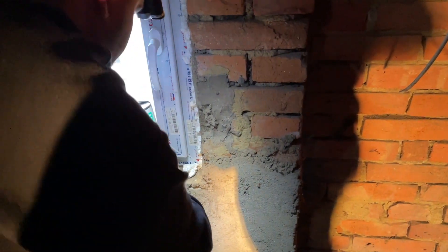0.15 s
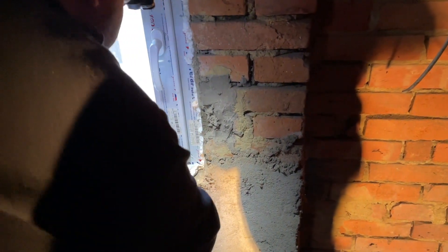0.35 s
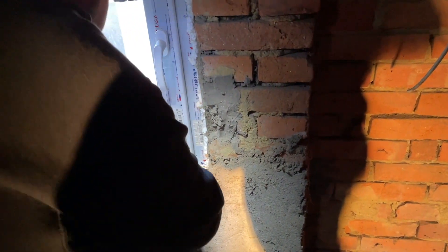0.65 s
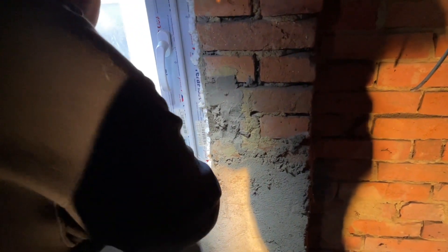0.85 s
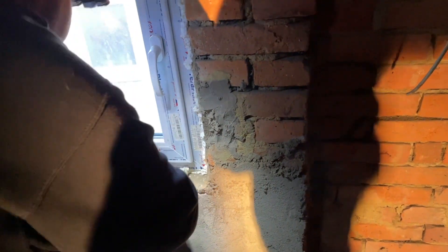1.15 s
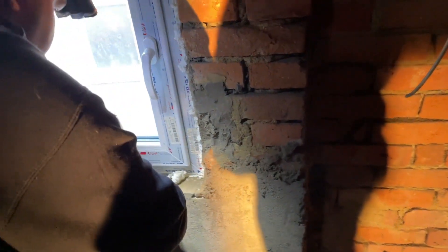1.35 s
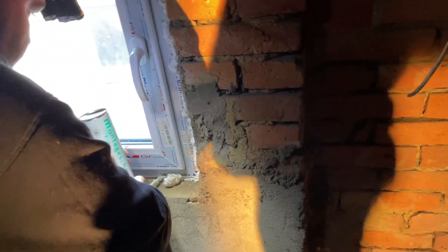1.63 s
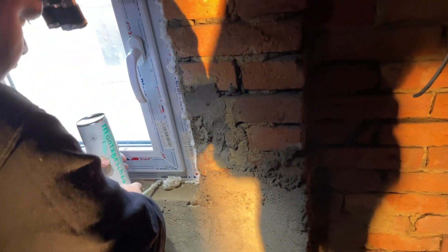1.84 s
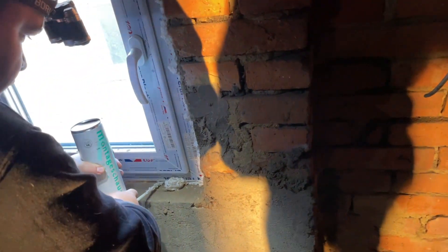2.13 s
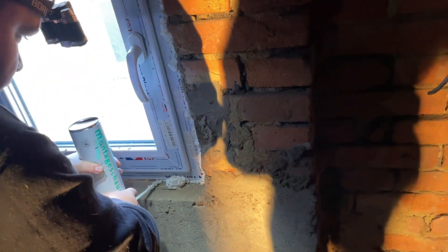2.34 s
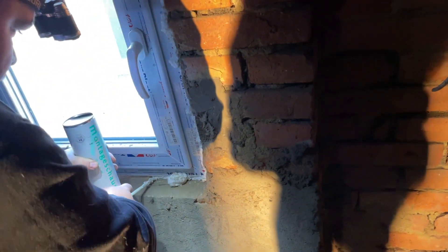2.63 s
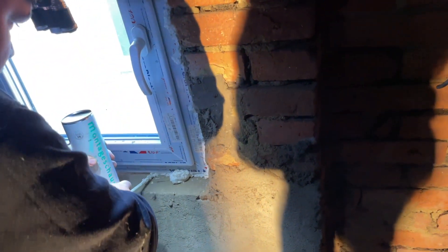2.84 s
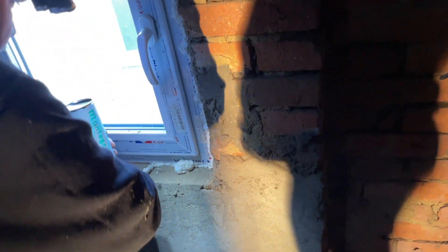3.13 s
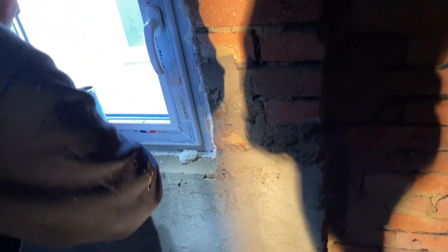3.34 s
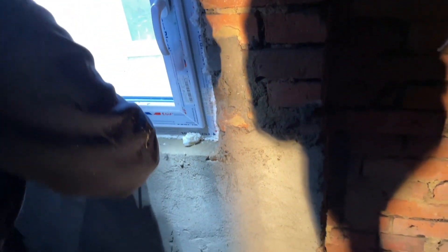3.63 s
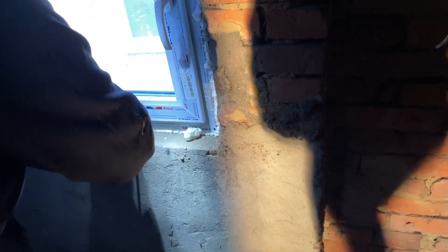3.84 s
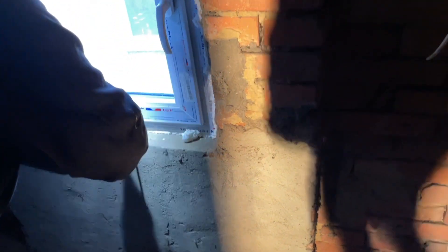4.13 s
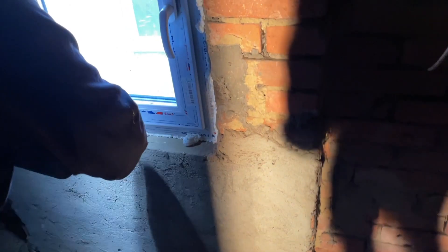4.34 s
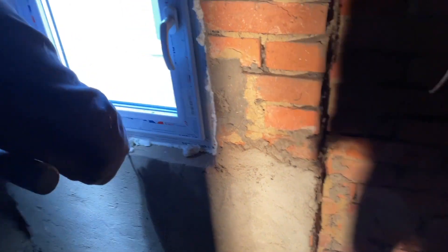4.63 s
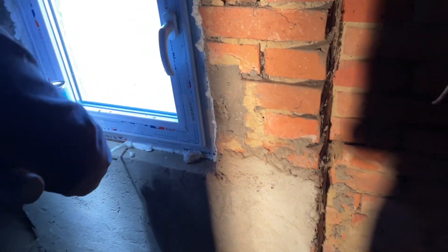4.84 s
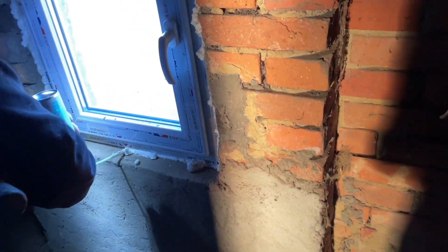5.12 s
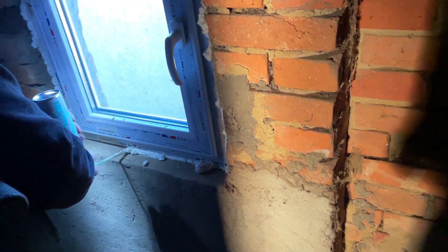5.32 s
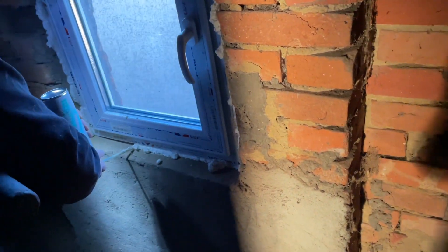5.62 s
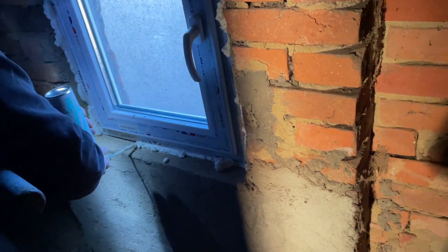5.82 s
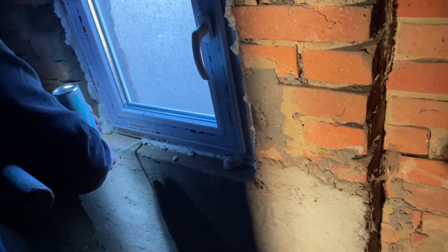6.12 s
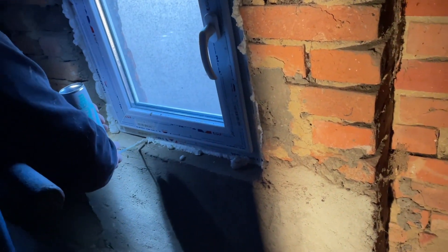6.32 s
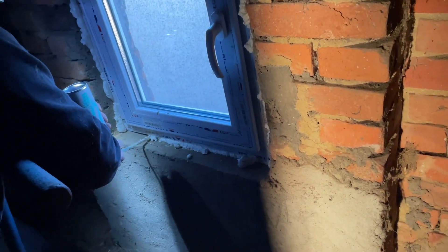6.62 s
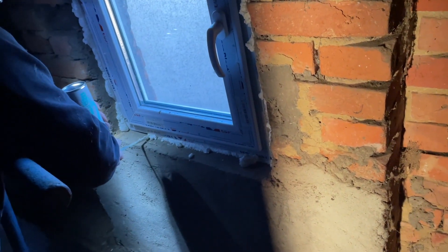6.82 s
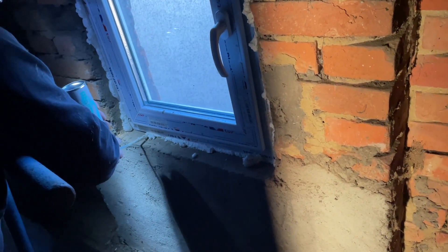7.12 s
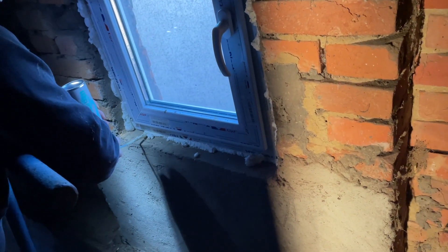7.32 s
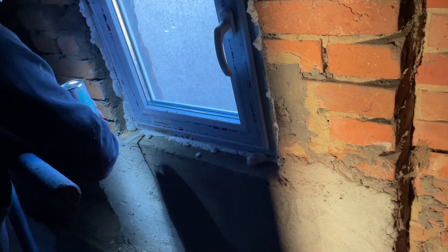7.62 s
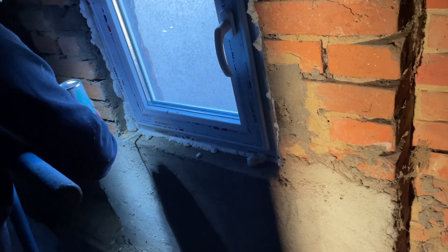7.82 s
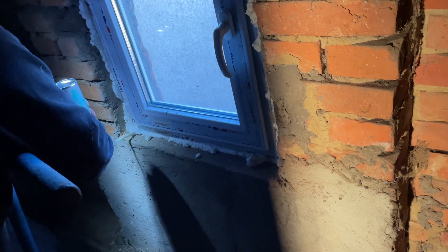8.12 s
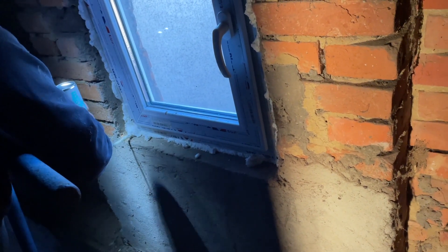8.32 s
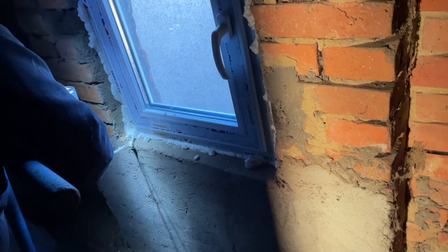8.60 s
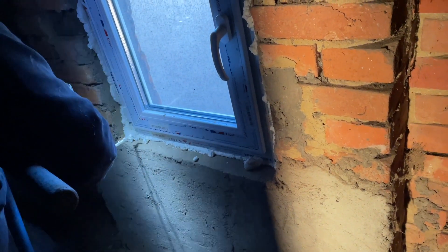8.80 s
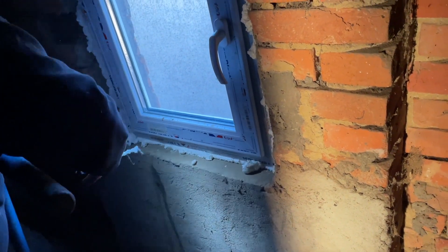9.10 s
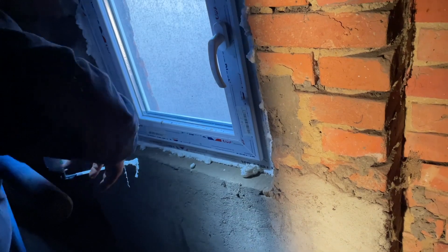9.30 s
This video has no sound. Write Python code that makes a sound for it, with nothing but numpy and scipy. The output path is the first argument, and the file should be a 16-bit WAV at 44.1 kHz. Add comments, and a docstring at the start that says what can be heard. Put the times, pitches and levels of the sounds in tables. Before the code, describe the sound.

Expanding foam sputters wetly through a straw into a window gap, gurgling with gas hiss, blasts hard once more, then stops abruptly with small clicks.

```python
"""In a bare brick room, expanding foam is squirted from a can through a straw into the gap under a window.
Random bubble bursts, shaped by resonances, sputter in the gap and in a pocket of the growing bead.
Crackling noise makes the propellant hiss; narrow noise bands make whistles, and single pops spit.
After a last strong blast the valve shuts; the trigger ticks, the can rings faintly and a sleeve rustles.
The window recess, brick echoes and a wide stereo image shape the sound, over a low rumble."""
import sys
import numpy as np
from scipy import signal
from scipy.fft import rfft, irfft, next_fast_len
from scipy.io import wavfile
from scipy.ndimage import uniform_filter1d

SR = 44100
rng = np.random.default_rng(int(sys.argv[2]) if len(sys.argv) > 2 else 0)


def digitize_waveform(pressure):
    """Quantize a signal to 16-bit integers and store it at the path in sys.argv[1].

    Rows of a 2-D input are taken as channels; values are limited to [-1, 1].
    """
    field = np.atleast_2d(pressure).T
    bounded = np.clip(field, -1, 1)
    quanta = np.round(bounded * 32767).astype(np.int16)
    wavfile.write(sys.argv[1], SR, quanta)


N = 416956
TIME = np.arange(N) / SR  # seconds
FRAME, HOP = 1024, 256  # short-time spectra (samples)
BINS = np.fft.rfftfreq(FRAME, 1 / SR)[:, None] + 1e-3  # Hz, kept just above zero

# rumble of the building: pitch_hz, level_db (per Hz)
AIR = [(15, -88), (35, -93), (52, -80.5), (70, -77), (95, -87), (140, -89), (220, -104.5), (400, -109),
       (1000, -117), (3000, -118), (15000, -126)]
# how long the room rings: pitch_hz, time to fall by 60 dB (s)
ROOM_T60 = [(120, 0.33), (400, 0.32), (900, .23), (1600, 0.16), (3000, .19), (7000, 0.16), (15000, 0.28)]
# pitches the window recess lifts or cancels; they drift, swell and fade as straw and microphones move:
# pitch_hz at 0 s, drift_hz_per_s, width_hz, level_db, strongest_s, fading_s
RECESS = [(256.6, 0.5, 36, 8.5, 5, 20), (373, 0, 30, 4.5, 4.1, 5.4), (419, 2.5, 65, -4, 4.4, 8.2),
          (598, 6.5, 72, 3, 7.9, 1.5), (595, 24.5, 95, -7.5, 5.3, 3), (798, 0, 51, 4, 4, 2.9),
          (895, -2, 61, 5, 2.85, .7), (940, 6, 29, 5.5, 6, 2), (1007, 11.5, 55, -9.5, 4, 17),
          (1170, 11.5, 135, 3.5, 5.2, 11), (1312, 1, 96, -13.5, 1.9, 1.9), (1440, -19, 98, 4.5, 0.47, 1.2),
          (1544, -24.5, 150, -7.5, 1.8, 2), (1560, 2.5, 41, 6.5, 7.7, 3.2), (1653, 0, 113, 6, 2.83, 0.75),
          (1770, 2, 110, 1.5, 0.76, .6), (1988, -14, 65, 4.5, 5.9, 2.4), (2224, -1.5, 110, 6.5, 8.15, 0.27),
          (2450, 0, 330, -4, 8, .7), (6000, 0, 660, -5.5, 1.4, 1.7)]
# stereo phase by pitch: left and right agree in the bass and oppose each other near 8 kHz
# and above 14 kHz: pitch_hz, phase (radians)
STEREO_PHASE = [(0, 0), (1100, 0), (1500, .3), (2200, 1.4), (3200, 2.9), (4400, 5.0), (6400, 5.6),
                (7300, 4.3), (7900, 3.2), (8700, 3.1), (9400, 2.1), (10500, .1), (12800, 0), (14300, -3),
                (16000, -3.1)]
# how alike left and right are: pitch_hz, likeness (0-1)
STEREO_LIKENESS = [(60, .94), (300, 0.94), (1100, 0.82), (2000, 0.73), (4500, 0.57), (7000, 1), (15000, 1)]
# stereo balance: pitch_hz, left minus right (dB)
STEREO_BALANCE = [(100, -0.1), (350, 1), (700, -1), (1100, 0.5), (1750, -3), (2400, -1.5), (3000, 3),
                  (5500, 4), (8000, 0)]
# direction of the sound: as the microphones turn, the jet drifts to one side; the later handling comes from
# near the middle: # start_s, share of the full phase
DIRECTION = [(1.3, 0.52), (2.6, 0.89), (4.3, 1.04), (8.4, 1.01), (8.55, .1)]
DIRECTION_BELOW_HZ = 5500  # the phase share is applied below this pitch; above it the phase stays fixed
CUTOFF_HZ = 15750  # top of the recorder's range

# soft knocks of the can and arm against the sill: start_s, peak level_db, pitch_hz
KNOCKS = [(1.295, -25, 287), (3.152, -37, 110), (3.24, -44, 65)]
# ticks of the released trigger: start_s, peak level_db (before a shared offset), crumble (0-1),
# ring of the can (dB)
TICKS = [(8.8076, -53, .1, 8), (8.837, -44.5, .2, 14), (8.9493, -38.5, 0.04, -12), (8.956, -48, .25, -12),
         (9.1405, -55, .2, -12)]
# ringing parts of the trigger: pitch_hz, width_hz, level_db
TRIGGER = [(2450, 560, 5), (4080, 3700, 4.5), (6300, 1900, 1), (11100, 4000, -2)]
CAN_HZ, CAN_WIDTH_HZ = 1130, 110
# movement after the jet: start_s, sleeve rubbing level_db, body shuffling level_db
MOVES = [(8.298, -79, -100), (8.48, -82, -100), (8.54, -72, -100), (8.701, -74.5, -98), (8.9, -76, -99.5),
         (8.98, -68, -82), (9.07, -68.5, -69), (9.18, -82.5, -73.5), (9.3, -92, -72), (9.45, -90, -72.5)]
# tone of the sleeve, only relative: pitch_hz, level_db (per Hz)
SLEEVE = [(300, -19.5), (1500, -13), (2500, -0.5), (3300, -2.5), (5000, 3), (10000, 4), (16000, -11.5)]
# tone of the shuffling, only relative: pitch_hz, width_hz, level_db
SHUFFLE = [(300, 180, 0), (646, 220, 1.5), (1590, 300, -15.5), (2620, 990, -9.5)]

# narrow fuzzy bands: whistles of gas, then a faint ring of the can and squeaks of the rustling sleeve:
# start_s, end_s, pitch_hz, width_hz, rms level_db (before the fades)
NARROW_BANDS = [(0.15, 0.28, 7500, 600, -60), (1.078, 1.738, 7700, 1300, -62),
                (5.25, 5.86, 1960, 170, -36.5), (5.794, 6.78, 1870, 150, -40.5),
                (7.901, 8.276, 6720, 503, -46.5), (8.2, 8.722, 2540, 220, -83), (9, 9.119, 1584, 130, -78),
                (9.127, 9.3, 2650, 400, -80)]
# low flutter under the sputter: start_s, rms level_db
FLUTTER = [(0, -64), (0.6, -57), (1.5, -60.5), (2.1, -57), (3.3, -58.5), (4.4, -64)]
# large bubbles that spit out of the straw: start_s, peak level_db (before a shared offset), pitch_hz
SPITS = [(0.177, -22, 1180), (0.491, -11.5, 1110), (1.838, -18, 1100), (2.04, -19.5, 880),
         (2.258, -19.5, 830), (2.614, -17.5, 910), (2.982, -19, 860), (3.907, -20, 780), (5.299, -32, 4410),
         (5.392, -19, 1920), (7.912, -18, 1580)]
# plugs of froth that surge through the straw: start_s, end_s, pitch_hz, width_hz,
# rms level_db (before the fades)
SURGES = [(0.061, 0.123, 1220, 864, -34), (0.172, 0.37, 2070, 800, -46), (0.625, 0.708, 1105, 810, -26.5),
          (1.17, 1.57, 1830, 1080, -36.5), (1.483, 1.555, 1080, 604, -25.5),
          (1.686, 1.787, 1890, 1100, -37.5), (2.044, 2.168, 2700, 1410, -53),
          (2.453, 2.6, 2900, 1300, -47.5), (2.52, 2.558, 1000, 1200, -30.5),
          (2.94, 3.067, 2200, 1390, -41.5), (3.176, 3.243, 980, 710, -30), (3.57, 3.79, 2450, 1000, -44.5),
          (3.91, 4.128, 5060, 2200, -50.5), (4.07, 4.29, 2930, 500, -44.5),
          (4.096, 4.25, 1670, 1000, -36.5), (4.805, 4.95, 2530, 500, -48), (5.677, 5.89, 1490, 600, -35),
          (6.76, 7.12, 4550, 900, -55), (8.043, 8.14, 3280, 2200, -36.5)]
SURGE_EDGE_S = 0.0179  # a surge starts and stops this quickly

SHUT_S, SHUT_TIME = 8.236, 0.035  # the valve starts to close (s), and takes this long (s)
# the finger on the trigger meters the foam: start_s, flow (dB)
FLOW = [(0, -8.5), (.13, -2.5), (.19, 1.8), (.34, 1.8), (.44, -1), (.72, 2.4), (1.3, 1.4), (1.53, 2.5),
        (1.83, 2.5), (1.88, -1), (2.14, -1), (2.19, -3.5), (2.32, -2), (2.46, .8), (2.7, -1.5), (3.22, 1),
        (3.42, -2), (3.65, 1), (4.22, 0.65), (4.38, -3.4), (4.55, -2.4), (4.93, 0), (5.15, -1.5),
        (5.8, 1.3), (6.15, -1.4), (7.15, -0.04), (7.45, -.8), (7.56, -2.8), (7.66, -1.2), (7.78, -1.8),
        (7.815, -8.5), (7.86, -3.6)]
# dB of level per dB of flow: the pocket and the gas react more than the gap
GAP_FOLLOWS, POCKET_FOLLOWS, GAS_FOLLOWS = 1, 3.07, 1.39
# as the gap fills, its pitch mostly sinks and the straw gurgles more:
# start_s, gap pitch_hz, gap sputter level_db (per Hz, at a flow of 0 dB), gurgle level_db (per Hz)
FILLING = [(0, 930, -59.5, -74), (1.5, 830, -63, -70.5), (2.1, 743, -58, -70.5), (4.5, 774, -60, -67),
           (7, 730, -60.5, -68.5), (8.2, 770, -60, -66)]
POCKET_DB = -63  # ring of the foam pocket at a flow of 0 dB (dB per Hz)
# the pocket in the bead shrinks and opens as the straw moves on: start_s, pitch_hz
POCKET_PITCH = [(.1, 1325), (.6, 1097), (1.7, 1260), (2.1, 1050), (3.05, 1100), (3.7, 1170), (4.3, 1430),
                (5.0, 1390), (5.38, 1730), (5.85, 1550), (6.1, 1780), (6.68, 1800), (6.95, 1390),
                (7.6, 1270), (8.05, 1540)]
# propellant slipping past the foam, at a flow of 0 dB: start_s, hiss level_db (per Hz)
GAS = [(0, -90), (.3, -102.5), (1.079, -100), (1.22, -95), (1.8, -96.5), (2.1, -92), (2.25, -95.5),
       (2.31, -90.5), (2.42, -93.5), (2.85, -93.5), (3.12, -91), (4.3, -90), (4.66, -94), (4.9, -86),
       (5.08, -88), (5.36, -79.5), (5.55, -87), (5.88, -86.5), (6.12, -93.5), (6.9, -92.5), (7.801, -95)]
# the hiss is brighter when the straw's tip is clear of the foam: start_s, slope (dB per octave)
HISS_SLOPE = [(0, -5.5), (.5, -18), (1.7, -13.5), (2.3, -9), (3.1, -13), (4.2, -13), (4.9, -8.5), (5.4, -8),
              (6, -12.5), (6.7, -11), (7.8, -9.5), (8.2, -10)]
# the vent that the gas keeps open in the foam: start_s, pitch_hz
VENT_PITCH = [(1.4, 2890), (2.2, 3350), (4.2, 3200), (4.7, 2800), (6.65, 2830), (7, 3250)]
VENT_STRENGTH = .6  # height of its ring against the plain hiss
BLAST_S = 7.845  # the trigger is squeezed hard for a last blast
# the gas peaks first, then the pocket, then the gap: (rise time s, lift dB, sag dB per s)
BLAST_GAS, BLAST_POCKET, BLAST_GAP = (0.099, 19.2, 7), (0.18, 21.3, 33), (0.35, 12.7, 1.97)


def amp(db):
    """Turns decibels into gain."""
    return 10 ** (np.asarray(db) / 20)


def unit(x):
    """Scales to rms 1."""
    return x / np.sqrt(np.mean(x ** 2) + 1e-20)


def curve(points, t):
    """Reads a table of times and values, with straight lines between its points."""
    return np.interp(t, *np.transpose(points))


def read(points, hz):
    """Reads a table along a logarithmic frequency axis."""
    f, value = np.transpose(points)
    return np.interp(np.log(hz + 1), np.log(f + 1), value)


def add(mix, s, sound):
    """Mixes a sound in at time s."""
    part = mix[max(round(s * SR), 0):][:len(sound)]
    part += sound[:len(part)]


def spectra(x):
    """Splits a sound into short-time spectra, bins by frames."""
    return signal.stft(x, nperseg=FRAME, noverlap=FRAME - HOP)[2]


def waveform(z):
    """Turns short-time spectra back into sound."""
    return signal.istft(z, nperseg=FRAME, noverlap=FRAME - HOP)[1][..., :N]


def coloured(x, response):
    """Filters by a response given as a function of Hz."""
    size = next_fast_len(len(x) + 4096)
    gain = response(np.fft.rfftfreq(size, 1 / SR) + 1e-3)
    return irfft(rfft(x, size) * gain, size)[:len(x)]


def resonance(f, centre_hz, q):
    """One damped resonance, gain 1 at its centre; a higher q is narrower and rings longer."""
    return 1 / (1 + 1j * q * (f / centre_hz - centre_hz / f))


def body(f, modes):
    """Several resonances of an object sounding together."""
    return sum(amp(db) * resonance(f, hz, hz / width) ** 2 for hz, width, db in modes)


def wander(rate_hz):
    """Slow random ups and downs of rms 1: noise with its fast changes removed."""
    return unit(coloured(rng.standard_normal(N), lambda f: 1 / (1 + (f / rate_hz) ** 4)))


def patches(shape):
    """A random field over pitch and time, smooth over some 900 Hz and a tenth of a second; rms 1."""
    field = uniform_filter1d(rng.standard_normal(shape), size=21, axis=0)
    return unit(uniform_filter1d(field, size=17, axis=1))


def bursts(per_s, spread_db, smooth_share):
    """Bubbles of many sizes burst at random over smooth turbulence; 0 dB per Hz."""
    sizes = amp(spread_db * np.minimum(rng.exponential(1, N), 5))
    pops = sizes * rng.choice([-1, 1], N) * (rng.random(N) < per_s / SR)
    share = np.clip(smooth_share, 0, 1)
    mixed = np.sqrt(1 - share) * unit(pops) + np.sqrt(share) * rng.standard_normal(N)
    return np.sqrt(SR / 2) * mixed


def blow(response, decay_s, crumble):
    """A sharp push and a short crumbling tail ring a body; peak 1."""
    t = np.arange(4096) / SR
    push = crumble * rng.standard_normal(len(t)) * np.exp(-t / decay_s)
    push[0] += 1
    ring = coloured(np.r_[np.zeros(48), push], response)
    ring[:32] *= np.hanning(64)[:32]  # fade in the silence before the push, to avoid a click
    return ring / abs(ring).max()


def air():
    """The low, steady rumble of the building: noise that is strongest in the bass."""
    return np.sqrt(SR / 2) * coloured(rng.standard_normal(N), lambda f: amp(read(AIR, f)))


def brick_tail():
    """Sparse echoes from bare brick, each band dying at its own speed; energy 1."""
    starts = np.arange(120, SR // 2, 20)
    taps = np.zeros(SR // 2 + 20)
    # one echo at a random place in every stretch of 20 samples
    taps[starts + rng.integers(0, 20, len(starts))] = rng.choice([-1., 1.], len(starts))
    hz, t, z = signal.stft(taps, SR, nperseg=256)
    decay = 1000 ** (-t / read(ROOM_T60, hz)[:, None])
    even_decay = decay / np.linalg.norm(decay, axis=1, keepdims=True)
    tail = signal.istft(z * even_decay, SR, nperseg=256)[1]
    return tail / np.linalg.norm(tail)


def echoes(x, count=6):
    """The pattern of echoes shifts as the straw travels along the sill: tails blend one into the next."""
    travel = np.linspace(0, count - 1, N)
    nearness = (np.cos(np.pi / 2 * np.clip(travel - k, -1, 1)) for k in range(count))
    return sum(signal.oaconvolve(x * near, brick_tail())[:N] for near in nearness)


def recess(x):
    """The window recess rings at some pitches and cancels others; the pattern slides over time."""
    f, t, z = signal.stft(x, SR, nperseg=4096, noverlap=3072)
    gain_db = 0
    for hz, drift, width, db, when, fade in RECESS:
        strength = np.exp(-((t - when) / fade) ** 2)
        distance = 1.38 * (f[:, None] - hz - drift * t) / width
        gain_db = gain_db + db * strength / (1 + distance ** 2) ** 2.28
    # give the gains the phase of a real ring, which only follows its cause
    log_gain = np.log(amp(np.vstack([gain_db, gain_db[-2:0:-1]])))
    causal = np.exp(np.conj(signal.hilbert(log_gain, axis=0)))[:len(f)]
    return signal.istft(z * causal, SR, nperseg=4096, noverlap=3072)[1][:N]


def stereo(one, other):
    """Makes left and right: they agree in the bass, and differ in phase, likeness and level by pitch."""
    a, b = spectra(one), spectra(other)
    alike = np.clip(read(STEREO_LIKENESS, BINS), 0, 1)
    lean = amp(read(STEREO_BALANCE, BINS) / 2)
    share = curve(DIRECTION, np.linspace(0, N / SR, a.shape[1]))
    phase = read(STEREO_PHASE, BINS) * np.where(BINS < DIRECTION_BELOW_HZ, share, 1)
    right = (alike * a + np.sqrt(1 - alike ** 2) * 1j * b) * np.exp(-1j * phase)
    return waveform(np.array([a * lean, right / lean]))


def handling(tick_db):
    """Blows ring the can and trigger; uneven noise makes the cloth rub and the worker shift."""
    out = np.zeros(N)
    for s, db, hz in KNOCKS:
        knock = blow(lambda f: resonance(f, hz, q=0.83) ** 2, decay_s=0.0059, crumble=0.05)
        add(out, s, amp(db) * knock)
    for s, db, crumble, can_db in TICKS:
        modes = TRIGGER + [(CAN_HZ, CAN_WIDTH_HZ, can_db)]
        tick = blow(lambda f: body(f, modes), decay_s=0.0038, crumble=crumble)
        add(out, s, amp(db + tick_db) * tick)
    s, sleeve_db, shuffle_db = np.transpose(MOVES)
    rubbing = amp(2.5 * wander(rate_hz=25)) * bursts(per_s=1400, spread_db=-1.5, smooth_share=0.57)
    sleeve = unit(coloured(rubbing, lambda f: amp(read(SLEEVE, f))))
    shifting = amp(2.5 * wander(rate_hz=15)) * rng.standard_normal(N)
    shuffle = unit(coloured(shifting, lambda f: body(f, SHUFFLE)))
    out += sleeve * amp(np.interp(TIME, s, sleeve_db))
    return out + shuffle * amp(np.interp(TIME, s, shuffle_db))


def flutter():
    """A low flutter of bass noise that swells and sinks until the valve starts to close."""
    low = unit(coloured(rng.standard_normal(N), lambda f: resonance(f, centre_hz=144, q=0.96) ** 2))
    return low * amp(curve(FLUTTER, TIME)) * (TIME < SHUT_S)


def narrow_bands():
    """Resonances narrow noise into fuzzy tones: gas whistles, then faint can ring and sleeve squeaks."""
    out = np.zeros(N)
    for start, end, hz, width, db in NARROW_BANDS:
        size = max(round((end - start) * SR), 64)
        noise = rng.standard_normal(2 * SR)[:size]
        tone = unit(coloured(noise, lambda f: resonance(f, hz, hz / width) ** 2))
        add(out, start, amp(db) * tone * signal.windows.tukey(len(tone), .5))
    return out


def spits(level_db):
    """Single large bubbles pop in the gap, each a short damped ring."""
    out = np.zeros(N)
    for s, db, hz in SPITS:
        pop = blow(lambda f: resonance(f, hz, q=1.4) ** 2 / (1 + (f / hz / 1.7) ** 6),
                   decay_s=.002, crumble=.05)
        add(out, s, amp(db + level_db) * pop)
    return out


def surges():
    """Each plug of froth sputters in its own band and stops short."""
    out = np.zeros(N)
    froth = bursts(per_s=2100, spread_db=3.0, smooth_share=.35)
    for start, end, hz, width, db in SURGES:
        first = max(round(start * SR), 0)
        size = max(round((end - start) * SR), 64)
        sputter = unit(coloured(froth[first:][:size], lambda f: resonance(f, hz, hz / width) ** 3))
        fades = signal.windows.tukey(len(sputter), 2 * SURGE_EDGE_S * SR / size)
        add(out, start, amp(db) * sputter * fades)
    return out


def blast(t, rise_s, lift_db, sag_db_per_s):
    """The last squeeze lifts a layer by some dB; it then sags as the pressure drops."""
    since = t - BLAST_S
    return lift_db * np.clip(since / rise_s, 0, 1) - sag_db_per_s * np.maximum(since - rise_s, 0)


def spurts(per_s, decay_s, share):
    """A gain of rms 1 that jumps each time a film of foam breaks, then dies away."""
    breaks = rng.exponential(1, N) * (rng.random(N) < per_s / SR)
    power = signal.lfilter([1], [1, -np.exp(-1 / (decay_s * SR))], breaks)
    share = np.clip(share, 0, 1)
    return np.sqrt(1 - share + share * power / power.mean())


def jet():
    """Uneven flow bursts bubbles into the gap and the foam pocket; escaping gas adds a crackling hiss."""
    valve = np.clip(1 - (TIME - SHUT_S) / SHUT_TIME, 0, 1) ** 2
    flow = valve * unit(amp(1.15 * wander(rate_hz=39)))
    in_gap = spectra(flow * bursts(per_s=1400, spread_db=2.0, smooth_share=0.33))
    in_pocket = spectra(flow * bursts(per_s=1000, spread_db=2.0, smooth_share=0.27))
    in_straw = spectra(valve * bursts(per_s=900, spread_db=2.5, smooth_share=0.39))
    crackle = spurts(per_s=70, decay_s=.009, share=.33)
    gas = spectra(valve * crackle * bursts(per_s=3000, spread_db=3.3, smooth_share=.6))

    t = np.arange(gas.shape[1]) * HOP / SR
    flow_db = curve(FLOW, t)
    pocket_hz = curve(POCKET_PITCH, t)
    fill_s, *fill_columns = np.transpose(FILLING)
    gap_hz, sputter_db, gurgle_db = (np.interp(t, fill_s, column) for column in fill_columns)
    gap_db = sputter_db + GAP_FOLLOWS * flow_db + blast(t, *BLAST_GAP)
    pocket_db = POCKET_DB + POCKET_FOLLOWS * flow_db + blast(t, *BLAST_POCKET)
    gas_db = curve(GAS, t) + GAS_FOLLOWS * flow_db + blast(t, *BLAST_GAS)

    # the narrow gap radiates little bass, and the soft foam swallows the treble
    gap_edges = np.sqrt((1 + (BINS / 1400) ** 8) * (1 + (430 / BINS) ** 8))
    gap = resonance(BINS, gap_hz, q=1.204) / gap_edges
    # the pocket rings with a main mode and a weak overtone
    pocket = resonance(BINS, pocket_hz, q=1.7) ** 2 / np.sqrt(1 + (BINS / pocket_hz / 1.48) ** 14)
    pocket = pocket + amp(-21.5) * resonance(BINS, 1.8 * pocket_hz, q=2.4) ** 2
    # foam gurgles down the straw, following the flow only a little
    straw = resonance(BINS, centre_hz=332, q=2.5) / (1 + (BINS / 600) ** 4)
    gurgle = amp(gurgle_db + 0.13 * (gap_db - sputter_db)) * straw
    drift_db = 1.84 * patches(gas.shape)  # openings in the foam keep changing the colour
    slope_db = curve(HISS_SLOPE, t) * np.log2(np.maximum(BINS, 1500) / 6000)
    hiss = amp(gas_db + drift_db + slope_db) / np.sqrt(1 + (2200 / BINS) ** 6)
    # the vent rings just below its pitch and cuts off just above it
    vent = 1 - 1j * VENT_STRENGTH * resonance(BINS, curve(VENT_PITCH, t), q=9.0)

    foam = in_gap * gap * amp(gap_db) + in_pocket * pocket * amp(pocket_db) + in_straw * gurgle
    return waveform(foam + gas * hiss * vent)


def scene():
    """The foam sounds ring in the recess; everything echoes, and diffuse echoes set left and right apart."""
    source = recess(jet() + surges() + spits(level_db=1))
    source = source + flutter() + narrow_bands() + handling(tick_db=-4.0)
    wet = amp(-9)  # echoes against direct sound
    heard = (source + wet * echoes(source)) / np.hypot(1, wet)
    return stereo(heard + air(), echoes(source) + air())


def record(dry):
    """The recorder's steep band limit removes the highest treble."""
    low_pass = signal.firwin(511, CUTOFF_HZ, window=("kaiser", 9), fs=SR)
    return signal.oaconvolve(dry, low_pass[None], "same")


dry = scene()
out = record(dry)
digitize_waveform(out)
```